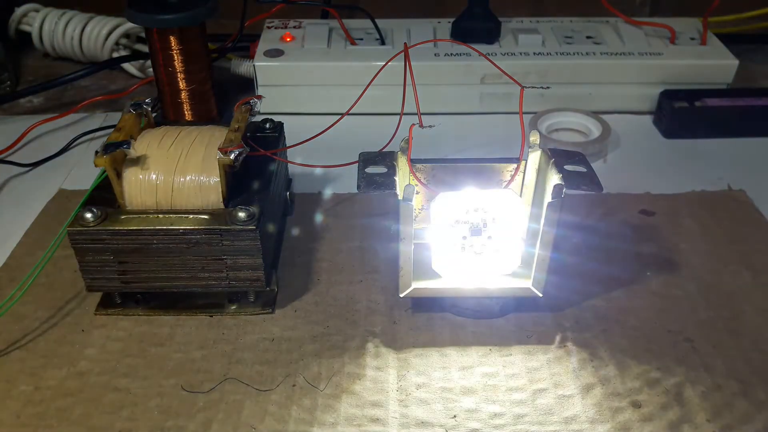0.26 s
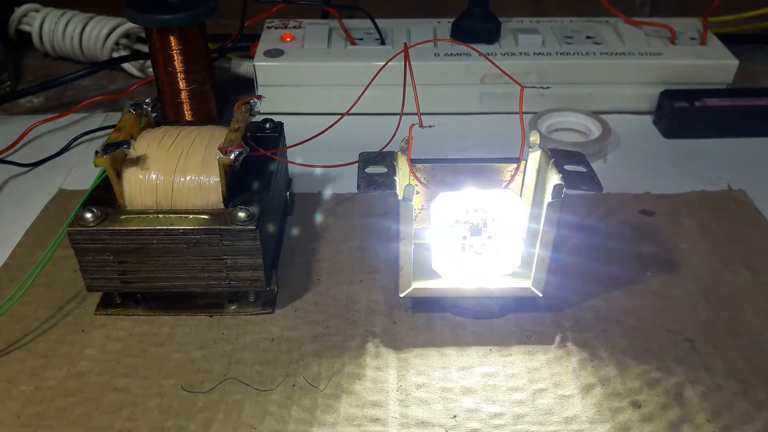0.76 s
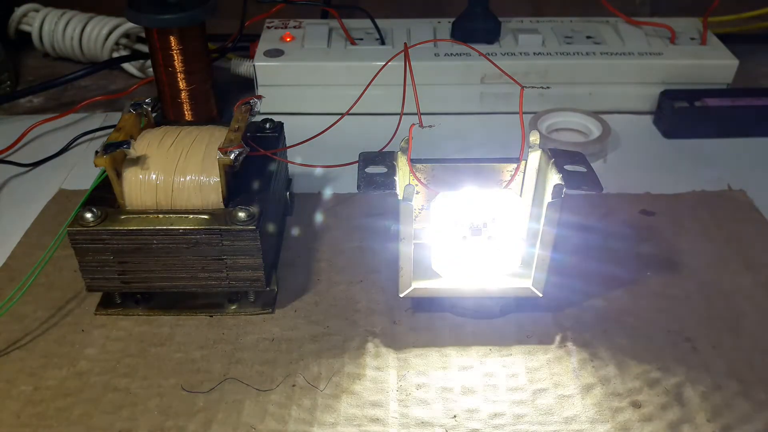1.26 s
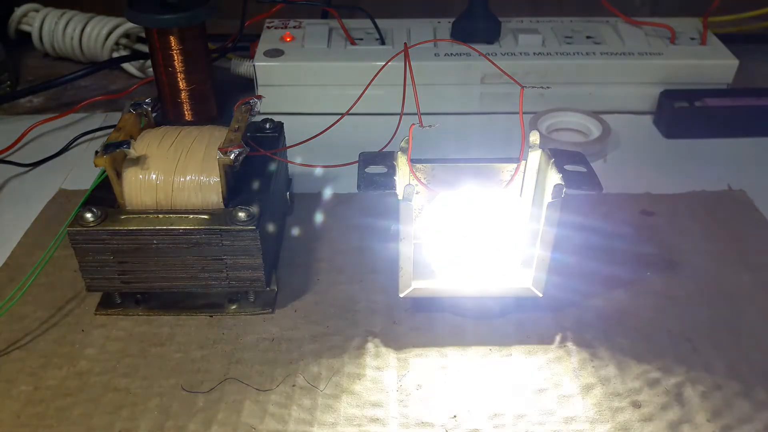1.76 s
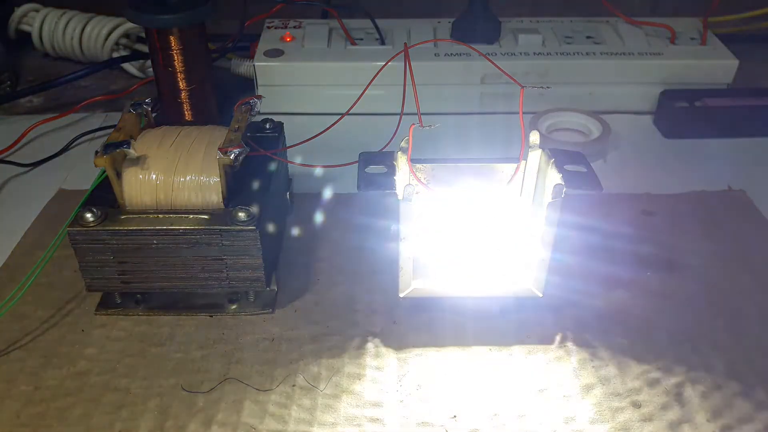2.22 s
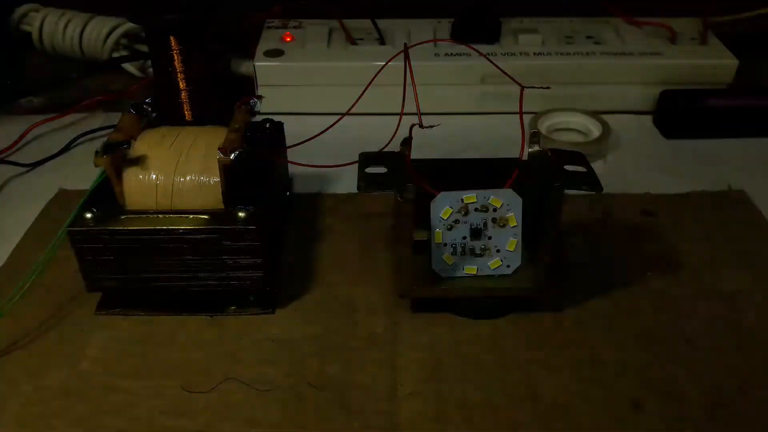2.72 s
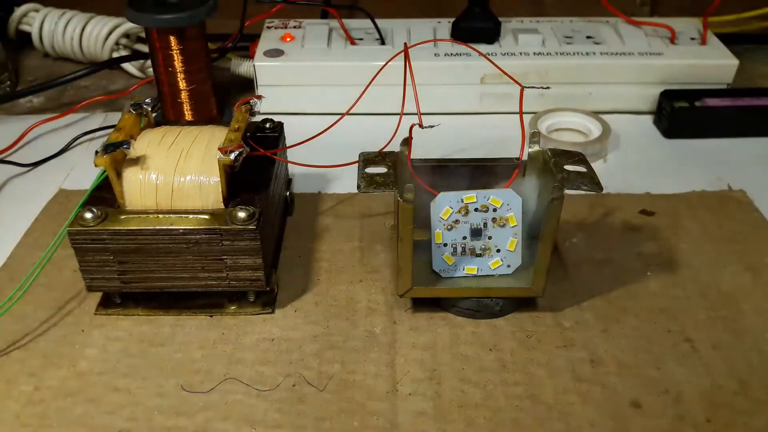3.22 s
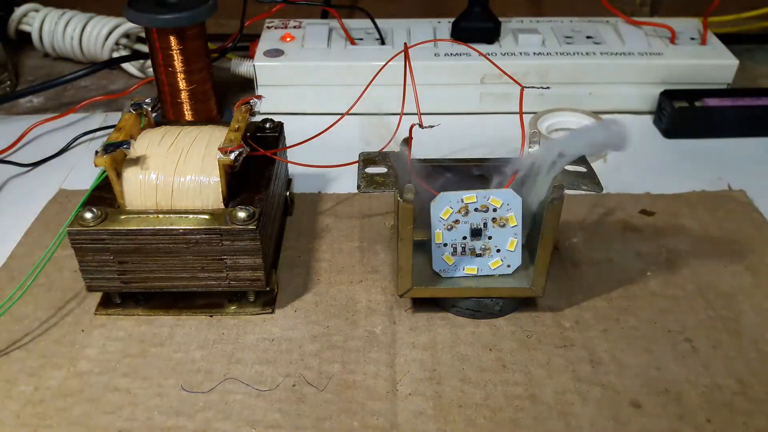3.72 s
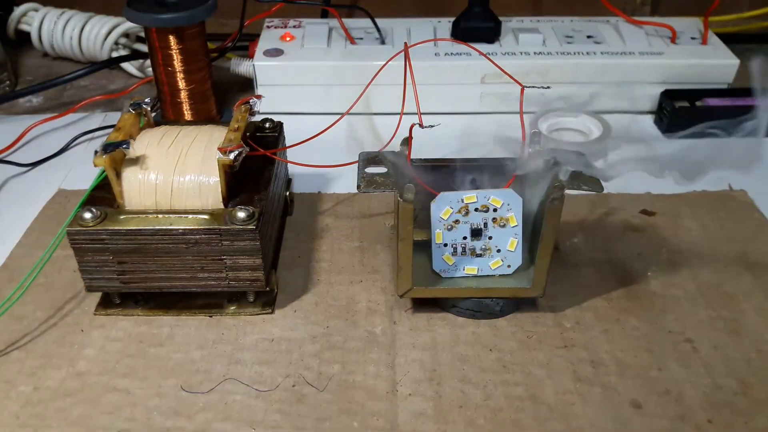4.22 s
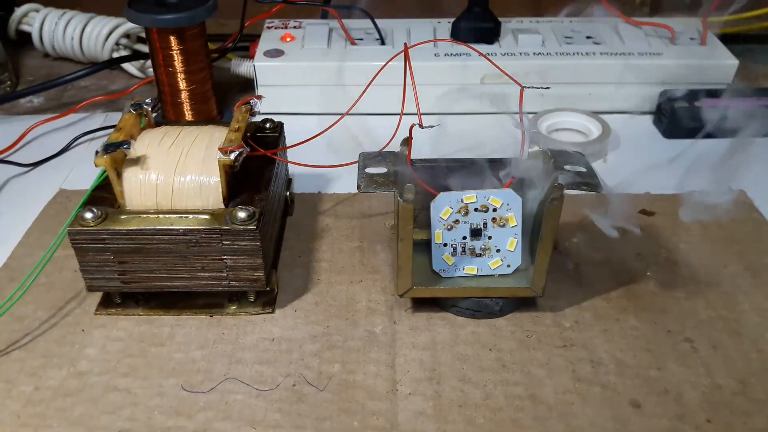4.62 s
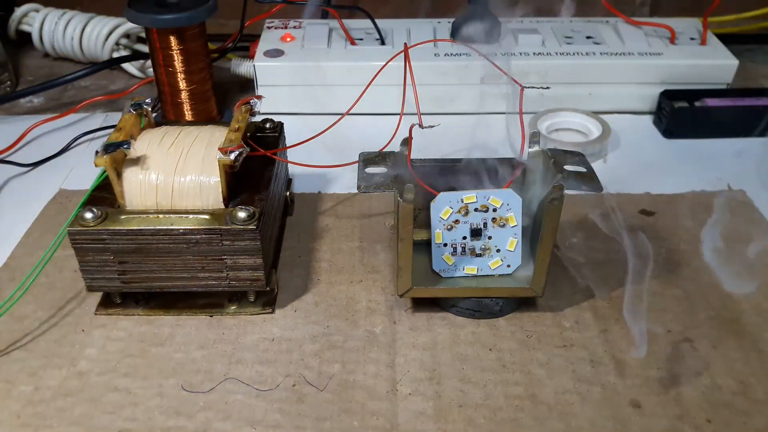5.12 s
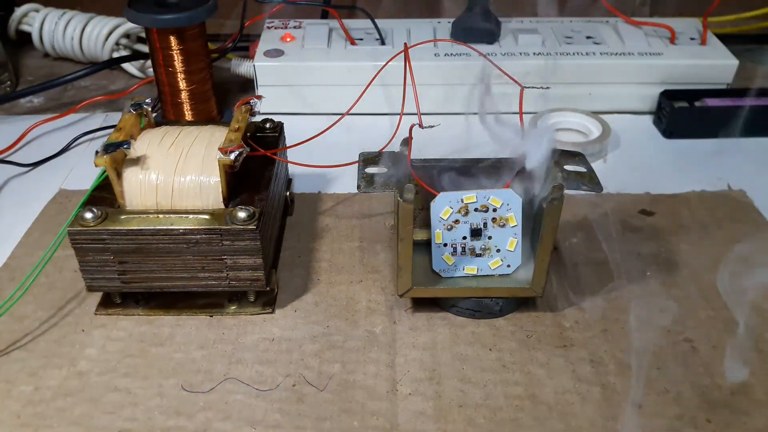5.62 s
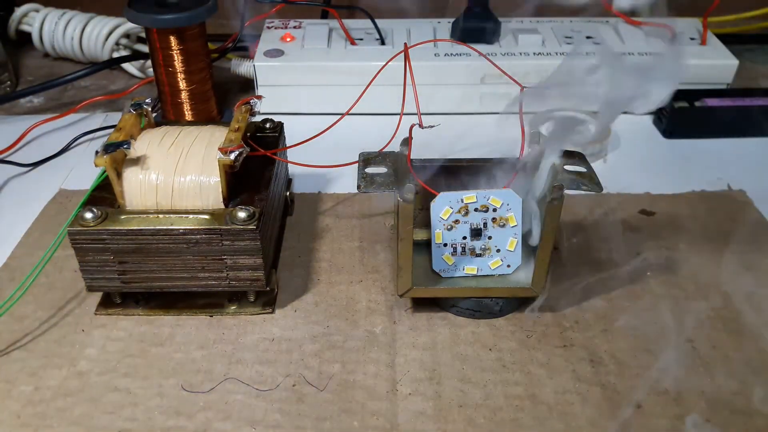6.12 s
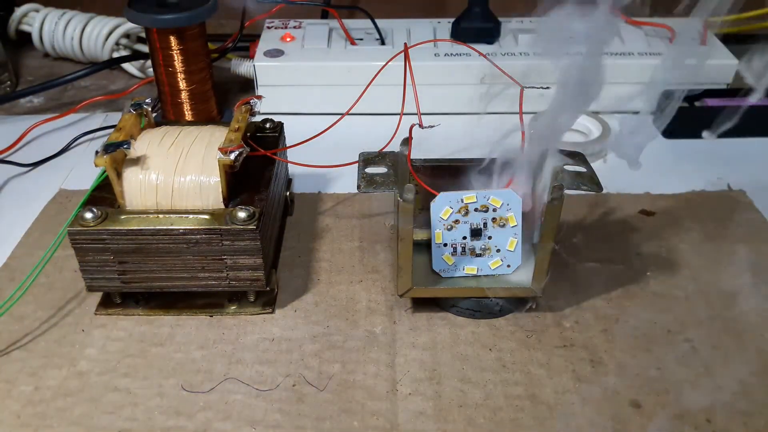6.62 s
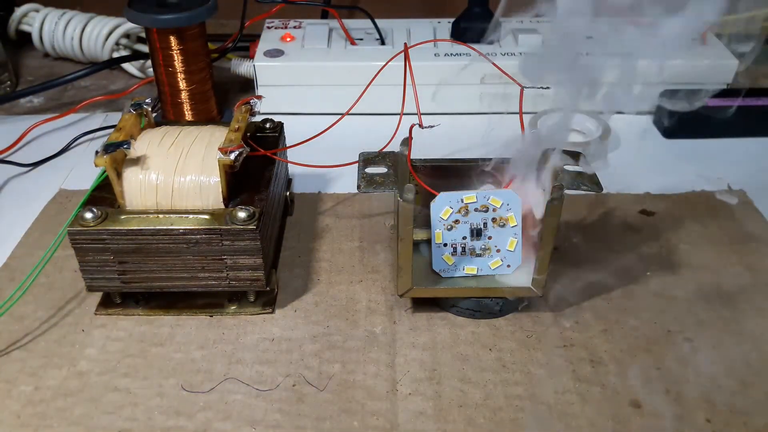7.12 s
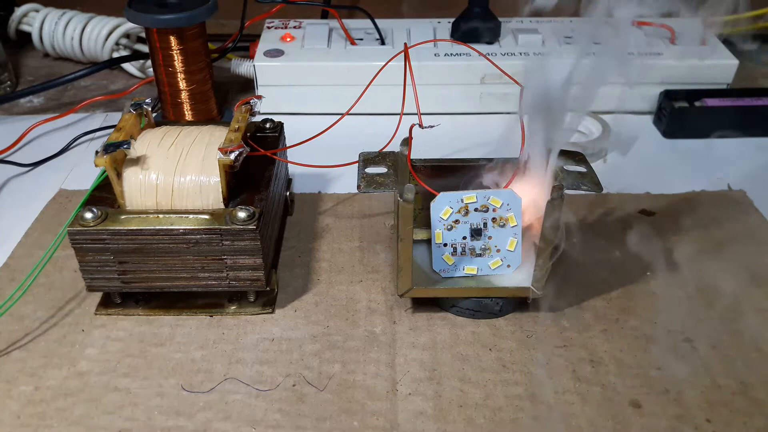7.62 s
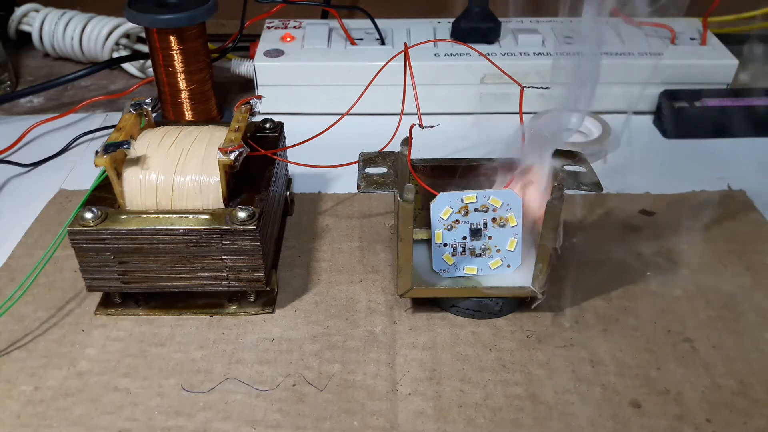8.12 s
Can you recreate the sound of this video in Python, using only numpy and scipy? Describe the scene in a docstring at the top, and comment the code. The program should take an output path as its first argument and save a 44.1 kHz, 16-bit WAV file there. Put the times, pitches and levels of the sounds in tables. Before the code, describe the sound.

A close microphone in a small room, everything nearly centred. After a faint fading start, transformer hum and room air come in abruptly at 0.3 s and slowly swell, with tiny dry ticks. From about 1 s a thin, very high sizzle appears, pulsing at mains rate, jumping up near 1.3 s with small spits, strongest around 1.8 s and fading by 2.7 s. A sharp crack at 2.77 s starts a rasping arc; at 2.9 s comes a huge, clipped bang, with a short metallic ring. Snaps follow at 3.0-3.4 s while the background sinks, returning around 4-4.5 s. The arc surges in fizzing, raspy spits with bright gas hiss at 4.3-5.2 s, buzzes denser near 5.4 s, then rasps coarsely at about fifty pulses a second, spitting between 6.4 and 7.2 s. Soft low burning continues, with barely audible whistles; from 7.5 s the buzz doubles and hiss rises until 8.3 s.

```python
"""An electric arc burns in a charred LED lamp board in a steel bracket, spitting in step with the mains.
Before it, the overdriven chips sizzle in time with the mains until one cracks, the lamp goes out and
the arc strikes. A part then bursts with a loud bang made of a pulse, scattered noise and ringing tones.
Sharp cracks, the soft rush of burning and a few faint whistles are shaped noise.
Behind them a transformer hums on multiples of the mains, over the noise of the room."""
import sys
import numpy as np
from scipy import signal
from scipy.fft import rfft, irfft
from scipy.io import wavfile

SR = 44100
rng = np.random.default_rng(int(sys.argv[2]) if len(sys.argv) > 2 else 0)


def put_to_file(sound):
    """Save the sound as 16-bit audio at rate SR, in the file named by the first command-line argument."""
    columns = np.atleast_2d(sound).T  # one column per channel
    safe = np.clip(columns, -1, 1)
    whole_steps = np.round(safe * 32767)
    wavfile.write(sys.argv[1], SR, whole_steps.astype(np.int16))


N = 368676
TIME = np.arange(N) / SR   # s
MAINS_HZ, CREST_S = 49.9835, .0077   # mains frequency; moment of one voltage crest, s
STRIKE_S = 2.769   # a chip cracks, the lamp goes out and the arc strikes
BANG_S = 2.8999   # a part bursts

# Peaks and hollows that bracket and microphone give the board's sounds [f/Hz, width/Hz, level/dB]
BOARD_COLOUR = [(1130, 130, 4), (1680, 70, 1.5), (2095, 82, 9.5), (2640, 130, 8), (3960, 990, -3.5),
                (5300, 130, 2), (6565, 210, 7.5), (7104, 120, 6.5), (7940, 330, -15.5), (8800, 150, 2.5),
                (9450, 320, -2), (10310, 230, 5)]
# The burning arc, before a small trim [t/s, rasp level/dB, gas jet level/dB]
ARC_LEVELS = [(3.12, -67.5, -63), (3.63, -58, -50.5), (4.15, -59.5, -49), (4.5, -46.5, -39.5),
              (4.61, -48, -37.5), (4.66, -55, -47.5), (5.07, -49.5, -43.5), (5.32, -58, -57),
              (5.67, -52, -53.5), (5.8, -56, -59), (5.93, -48, -52), (6.09, -51.5, -61.5),
              (6.59, -48, -57.5), (7.31, -50, -61.5), (7.39, -58.5, -63), (7.91, -50.5, -46.5),
              (7.95, -54.5, -54), (8.35, -51.5, -45.5)]
# Flares at the strike and at the bang [t/s, level/dB above the running level, settling time/s]
FLARES = [(2.769, 9, .15), (2.9, 35.5, 0.054)]
# How far the arc burns on both polarities, as it does when fresh, briefly near 5.4 s,
# and again from about 7.5 s [t/s, share 0-1]
BOTH_WAYS = [(2.77, 0.89), (3.3, 0.85), (3.55, 0.3), (5.15, 0.02), (5.4, 1), (5.85, 0), (7.3, 0), (7.55, 1)]
# Tone balance of the rasp [f/Hz, relative level/dB]
RASP_SPECTRUM = [(200, -17.5), (1000, -4.5), (2000, -2.5), (2700, 1), (3600, -1), (4500, -6.5), (5700, 5),
                 (7200, 3), (9000, -3.5), (10600, -2.5), (12000, -14), (16000, -20)]
# Extra peaks and hollows of the rasp [f/Hz, width/Hz, level/dB]
RASP_PEAKS = [(1650, 200, -1.5), (4260, 440, -1.5), (5220, 56, 2.5)]
# Tone balance of the gas jets [f/Hz, relative level/dB]
JET_SPECTRUM = [(2000, -35), (7000, -27), (9000, -14.5), (10500, -6.5), (11400, -6), (12400, -1),
                (13000, -4), (13700, 4.5), (14400, -1), (15000, -8.5), (16000, -17.5)]


def arc():
    """Char conducts mainly one way: fifty rasps a second, each driving a gas jet; a two-way arc doubles that."""
    s, rasp_db, jet_db = np.transpose(ARC_LEVELS)
    flare_db = 0
    for start, db, settle_s in FLARES:
        flare_db = flare_db + db * (TIME >= start) * np.exp(-np.abs(TIME - start) / settle_s)

    one_way = mains_gate(width_s=.0038, weak_db=-14, uneven_db=1.7, between_db=-22)
    two_way = mains_gate(width_s=.004, weak_db=-2.0, uneven_db=3.0, between_db=-21.0)
    share = np.clip(np.interp(TIME, *np.transpose(BOTH_WAYS)), 0, 1)
    polarity_mix = (1 - share) * one_way + share * two_way
    current = (TIME >= STRIKE_S) * from_db(flare_db) * polarity_mix

    rasp_noise = from_db(np.interp(TIME, s, rasp_db)) * current * grains()
    jet_noise = from_db(np.interp(TIME, s, jet_db)) * current * grains()
    rasping = from_db(0.1) * shape(rasp_noise, RASP_SPECTRUM, BOARD_COLOUR + RASP_PEAKS)
    jetting = from_db(-0.6) * shape(jet_noise, JET_SPECTRUM, BOARD_COLOUR)
    return rasping + jetting


# Half-cycles in which a pocket of gas blows out [t/s, level/dB against a plain strong half-cycle]
SPITS = [(1.288, 8), (1.348, 8), (1.468, 7), (1.508, 9.5), (1.778, 9), (4.249, 3), (4.329, 6), (4.349, 4.5),
         (4.429, 4), (4.469, 3), (4.529, 4.5), (4.569, 5), (4.589, 8.5), (4.909, 4.5), (4.929, 8),
         (4.969, 8), (5.109, 7.5), (5.149, 7), (6.369, 6), (6.509, 3), (6.609, 4), (7.149, 5)]


def mains_gate(width_s, weak_db, uneven_db, between_db):
    """Current flows near each voltage crest, unevenly; one polarity may be weaker, spits have set levels; rms 1."""
    nearest = np.round(half_cycles(TIME)).astype(int)
    from_crest_s = (half_cycles(TIME) - nearest) / (2 * MAINS_HZ)
    count = nearest[-1] + 1
    uneven = uneven_db * np.clip(rng.standard_normal(count), -2, 2)
    crest_db = uneven + weak_db * (np.arange(count) % 2)   # every second crest is the weak polarity
    for s, db in SPITS:
        crest_db[round(half_cycles(s))] = db
    conducting = np.exp(-(2 * from_crest_s / width_s) ** 4)   # flat top, steep sides
    return rms_one(from_db(crest_db)[nearest] * conducting + from_db(between_db))


def half_cycles(s):
    """Time counted in half-cycles of the mains; whole numbers are voltage crests."""
    return (s - CREST_S) * 2 * MAINS_HZ + 2


DRYING_S = 1.4   # the chips start to dry out and the faint early ticks end

# Overheating chips, before a small trim [t/s, sizzle level/dB]
SIZZLE_LEVELS = [(0.9, -96), (0.992, -74.5), (1.274, -58), (1.284, -51), (1.734, -47.5), (1.786, -45),
                 (1.826, -45), (2.35, -47.5), (2.74, -68.5)]
# Tone balance of the sizzle [f/Hz, relative level/dB]
SIZZLE_SPECTRUM = [(500, -44.5), (2500, -24), (5000, -22), (7000, -21), (9000, -25), (10500, -16.5),
                   (11600, -6.5), (12600, -5.5), (14000, -3), (15300, -1.5), (16000, -7.5)]
# Extra peaks and hollows while the coating is wet [f/Hz, width/Hz, level/dB]
WET_PEAKS = [(6200, 1300, -5), (12700, 730, 8.4)]
# Extra peaks once it is dry [f/Hz, width/Hz, level/dB]
DRY_PEAKS = [(4330, 70, 7), (4950, 60, 8), (6200, 1300, 2), (14800, 450, 4)]


def sizzle():
    """Overheated chips boil their coating on both half-cycles; the hiss changes colour as they dry out."""
    gate = mains_gate(width_s=.0042, weak_db=0.0, uneven_db=3.5, between_db=-13.0)
    boil = gains(SIZZLE_LEVELS)[0] * (TIME < STRIKE_S) * gate
    dryness = ramp(DRYING_S, length_s=1.4)
    wet_noise = boil * np.sqrt(1 - dryness) * grains()
    dry_noise = boil * np.sqrt(dryness) * grains()
    wet = shape(wet_noise, SIZZLE_SPECTRUM, BOARD_COLOUR + WET_PEAKS)
    dried = shape(dry_noise, SIZZLE_SPECTRUM, BOARD_COLOUR + DRY_PEAKS)
    return from_db(0.5) * (wet + dried)


# The bang's first pulse: tone balance [f/Hz, relative level/dB]
BANG_SPECTRUM = [(30, -12), (90, -8.5), (170, 4), (240, -12.5), (450, -0.5), (850, 2), (1100, 2.5),
                 (1800, -4), (2600, -3.5), (3500, -11), (6000, -18), (10000, -21.5), (13000, -17.5),
                 (16000, -26.5)]
# Scattered noise of the bang: tone balance [f/Hz, relative level/dB]
SCATTER_SPECTRUM = [(25, -9.5), (60, -6.5), (150, -6), (240, -12.5), (600, 6.5), (800, -5.5), (1100, 0.5),
                    (1700, -4), (2600, -3.5), (3600, -3), (5500, -8), (7200, -14.5), (11000, -16),
                    (14200, -14), (16000, -14)]
# Its extra peaks and hollows [f/Hz, width/Hz, level/dB]
SCATTER_PEAKS = [(250, 60, 4), (1250, 120, -2), (2090, 69, -3), (4100, 610, 2.5)]
# What the bang leaves ringing in bracket, bench and room [f/Hz, relative level/dB]
BANG_MODES = [(169, -7.5), (305, -7), (439, -1), (525, -3), (581, -5), (656, 0), (745, -7), (995, -5.5),
              (1041, -8.5), (1110, -6.5), (1168, -4.5), (1280, -9), (1470, -7.5), (1632, -4.5),
              (2016, -5.5), (2110, -10), (2174, -5.5), (2516, -3.5), (2650, -2), (2740, -7), (3004, -7.5),
              (6500, -5.5)]
# Nearby surfaces, used here and in room() [delay t/s, level/dB]
ECHOES = [(.0018, -17.5), (.0087, -14)]


def bang(start, ring_t60):
    """One pressure pulse with its echoes, scattered by the clutter of the bench, sets everything ringing."""
    pulse = np.zeros(N)
    pulse[round(start * SR)] = from_db(19.0)
    for delay_s, db in ECHOES:
        pulse[round((start + delay_s) * SR)] = from_db(17.5 + db)

    short_scatter = from_db(-10.5) * dying(start, t60=0.018)
    long_scatter = from_db(-13.0) * dying(start, t60=0.21)
    scatter = grains() * (short_scatter + long_scatter)

    modes = np.zeros(N)
    for k, (hz, db) in enumerate(BANG_MODES):
        sign = (-1) ** k   # neighbouring tones start in opposite directions
        modes += sign * from_db(db) * np.cos(2 * np.pi * hz * (TIME - start))
    ringing = from_db(-19) * dying(start, ring_t60) * modes

    shaped_pulse = shape(pulse, BANG_SPECTRUM, BOARD_COLOUR)
    shaped_scatter = shape(scatter, SCATTER_SPECTRUM, BOARD_COLOUR + SCATTER_PEAKS)
    return shaped_pulse + shaped_scatter + ringing


# Short sharp cracks, the first two faint early ticks of sizzle; levels before filtering and trim
# [t/s, treble level/dB, body level/dB against the treble]
CRACKS = [(.418, -48, -20), (.729, -40.5, -14), (2.769, -21.5, 6), (2.7875, -30, 1), (3.0285, -25, -16),
          (3.0865, -23, -5.5), (3.2785, -28.5, -10.5), (3.408, -26, -16)]
# Tone balance of the cracks [f/Hz, relative level/dB]
CRACK_SPECTRUM = [(200, -23), (700, -7.5), (1200, 4.5), (2500, 2), (5000, 0), (9000, -6), (12500, 3),
                  (15000, 9), (16000, -3.5)]


def cracks(t60, split_hz):
    """Each crack or tick is a very short noise burst, with its own balance of low body and treble."""
    noise = rng.standard_normal(N)
    s, treble_db, body_db = np.transpose(list(CRACKS) + ticks())
    snap = from_db(-60 * TIME[:SR // 20] / t60)
    high_pass = signal.butter(4, split_hz, "high", fs=SR, output="sos")
    low_pass = signal.butter(4, split_hz, "low", fs=SR, output="sos")
    # the tiny offset keeps the filters from slowing down on silence
    treble = signal.sosfilt(high_pass, noise * bursts(s, treble_db, snap) + 1e-18)
    body = signal.sosfilt(low_pass, noise * bursts(s, treble_db + body_db, snap) + 1e-18)
    return from_db(-5.0) * shape(treble + body, CRACK_SPECTRUM, BOARD_COLOUR)


OPEN_S = .285   # hum and room air come in, and the random ticks begin
TICKS_PER_S, TICK_BODY_DB = 8, -20   # body against the treble
TICK_DB, TICK_SPREAD_DB = -54.5, 4   # mean and spread, before the trim of all cracks


def ticks():
    """Faint early ticks of sizzle, scattered at random, until DRYING_S; rows like those of CRACKS."""
    rows = []
    for slot in np.arange(OPEN_S, DRYING_S, 1 / TICKS_PER_S):
        s = slot + rng.random() / TICKS_PER_S
        level_db = TICK_DB + TICK_SPREAD_DB * rng.standard_normal()
        rows.append((s, level_db, TICK_BODY_DB))
    return rows


# Soft rush of the burning board [t/s, level/dB]
BURN_LEVELS = [(3.0, -83), (4.0, -76), (4.4, -62.5), (5.2, -55.5), (6.2, -56), (7.3, -59), (8.36, -52.5)]
# Tone balance of the rush [f/Hz, relative level/dB]
BURN_SPECTRUM = [(30, -19), (70, -2.5), (100, 2), (130, -10), (190, 7.5), (260, -3), (500, -6.5),
                 (1100, -8.5), (1700, -12.5), (2600, -13.5), (4000, -15), (9000, -22), (16000, -44)]


def burning():
    """Smoke and flame stream off the board with a soft low rush."""
    return gains(BURN_LEVELS)[0] * shape(rng.standard_normal(N), BURN_SPECTRUM, BOARD_COLOUR)


# Faint narrow tones that come and go [start t/s, end t/s, f/Hz, width/Hz, rms level/dB at full swell]
WHISTLES = [(2.608, 2.784, 555, 38, -59), (3.1, 3.8, 5200, 110, -76), (4.06, 4.284, 556, 18, -66),
            (6.5, 7.1, 633, 16, -64.5), (7.55, 7.9, 751, 17, -64.5)]


def whistles():
    """Noise in a narrow resonance, swelling and fading."""
    out = np.zeros(N)
    for start, end, hz, width_hz, db in WHISTLES:
        edges_hz = [hz - width_hz / 2, hz + width_hz / 2]
        band = signal.butter(2, edges_hz, "band", fs=SR, output="sos")
        swell = np.sqrt(np.abs(np.sin(np.pi * ramp(start, end - start))))
        out += from_db(db) * swell * rms_one(signal.sosfilt(band, rng.standard_normal(N)))
    return out


ROOM_T60_S = .24   # time for the tail to fall by 60 dB


def room(x, wet_db):
    """Echoes off the nearby surfaces (see ECHOES), and a short diffuse tail."""
    age = TIME[:SR // 2]
    tail = rng.standard_normal(len(age)) * from_db(-60 * age / ROOM_T60_S) * (age > .002)
    response = from_db(wet_db) * tail / np.linalg.norm(tail)
    response[0] = 1   # direct sound
    for delay_s, db in ECHOES:
        response[round(delay_s * SR)] += from_db(db)
    return signal.oaconvolve(x, response)[:N]


# Transformer hum, before a 2 dB lift and the background's rise and fall [f/Hz, rms level/dB]
HUM_TONES = [(100, -70.5), (200, -68), (500, -61), (650, -71.5), (700, -70), (750, -70), (800, -65),
             (900, -74), (1000, -72), (1050, -73.5), (1100, -68), (1200, -75), (1250, -77)]
# Tone balance of the room air [f/Hz, relative level/dB]
AIR_SPECTRUM = [(25, -15.5), (60, -10), (100, -2.5), (180, 2.5), (270, -2.5), (450, -4.5), (750, -7),
                (1100, -10.5), (1600, -14), (3000, -24), (5000, -32), (8000, -39.5), (15000, -34.5)]


def background():
    """The transformer core buzzes on multiples of the mains, over the noise of the room."""
    hum = np.zeros(N)
    for hz, db in HUM_TONES:
        exact_hz = round(hz / MAINS_HZ) * MAINS_HZ
        cycles = exact_hz * TIME + rng.random()
        hum += from_db(db) * np.sqrt(2) * np.sin(2 * np.pi * cycles)
    air = from_db(-55.2) * shape(rng.standard_normal(N), AIR_SPECTRUM)
    return background_gain() * (from_db(2.0) * hum + air)


# Diffuse room air, which differs between left and right [f/Hz, relative level/dB]
DIFFUSE_SPECTRUM = [(40, -6), (180, 2), (400, 2), (750, 1), (1300, -3.5), (2400, -9.5), (4400, -19),
                    (8000, -30), (15000, -20.5)]


def diffuse_air():
    """Room noise arriving from all around, following the same rise and fall as the background."""
    return from_db(-70.5) * background_gain() * shape(rng.standard_normal(N), DIFFUSE_SPECTRUM)


FAINT_DB, FADE_DB_PER_S = -11.5, 73   # faint, fading start
SWELL_S, SWELL_DB = 1.88, 4   # slow rise once they have come in
SINK_S, LOW_S, RETURN_S = .6, 0.56, 0.42   # after the bang: sinking, staying low, coming back
SUNK_DB, SETTLED_DB = -15.5, -1


def background_gain():
    """Hum and air fade from a faint start, come in at once and swell; after the bang they sink and return."""
    faint_db = FAINT_DB - FADE_DB_PER_S * TIME
    swelling_db = SWELL_DB * (ramp(OPEN_S, SWELL_S) - 1)
    opening_db = np.where(TIME < OPEN_S, faint_db, swelling_db)
    back = ramp(BANG_S + SINK_S + LOW_S, RETURN_S)
    sinking_db = SUNK_DB * ramp(BANG_S, SINK_S) * (1 - back)
    return from_db(opening_db + sinking_db + SETTLED_DB * back)


def from_db(db):
    """Decibels to gain."""
    return 10 ** (np.asarray(db) / 20)


def rms_one(x):
    """Scale to rms 1."""
    return x / np.sqrt(np.mean(x ** 2) + 1e-20)


def ramp(start, length_s):
    """Rises evenly from 0 to 1."""
    return np.clip((TIME - start) / length_s, 0, 1)


def gains(rows):
    """One gain curve for each dB column, silent before the first row."""
    s, *columns = np.transpose(rows)
    return [from_db(np.interp(TIME, s, column, left=-np.inf)) for column in columns]


def dying(start, t60):
    """Envelope that jumps to 1 at start and falls by 60 dB in t60 seconds."""
    return (TIME >= start) * from_db(-60 * np.clip((TIME - start) / t60, 0, 2))


def bursts(starts, levels_db, envelope):
    """Lay one short envelope at each start."""
    out = np.zeros(N + len(envelope))
    for s, db in zip(starts, levels_db):
        at = max(round(s * SR), 0)
        out[at:at + len(envelope)] += from_db(db) * envelope
    return out[:N]


def grains():
    """A dense stream of tiny discharges of uneven size, rms 1."""
    spread_db = 4.0
    sizes = from_db(spread_db * rng.standard_normal(N))
    return rms_one(rng.standard_normal(N) * sizes)


def shape(x, spectrum, peaks=(), size=4096):
    """Causal filter of unit energy that follows a spectrum with bell-shaped peaks on it."""
    hz = np.maximum(np.fft.rfftfreq(size, 1 / SR), 1)
    points_hz, points_db = np.transpose(spectrum)
    db = np.interp(np.log(hz), np.log(points_hz), points_db)
    for centre, width, peak_db in peaks:
        db = db + peak_db * np.exp(-.5 * ((hz - centre) / width) ** 2)
    # minimum phase: the filter responds as early as it can
    cepstrum = irfft(np.log(from_db(db)))
    response = irfft(np.exp(rfft(2 * cepstrum[:size // 2], size)))
    return signal.oaconvolve(x, response / np.linalg.norm(response))[:N]


def scene():
    """Board and transformer lie dead centre; only the diffuse room air tells the channels apart."""
    board = sizzle() + arc() + cracks(t60=.008, split_hz=6800)
    mid = room(board, wet_db=-8.5) + bang(start=BANG_S, ring_t60=0.17)
    mid = mid + burning() + whistles() + background()
    side = diffuse_air()
    return np.stack([mid + side, mid - side])


CUTOFF_HZ = 15600


def record(dry):
    """The bang overloads the input, which clips at 0.95; the top of the treble is cut."""
    clipped = np.clip(dry, -.95, .95)
    low_pass = signal.ellip(10, .1, 80, CUTOFF_HZ, fs=SR, output="sos")
    return signal.sosfilt(low_pass, clipped)


dry = scene()
out = record(dry)
put_to_file(out)
```